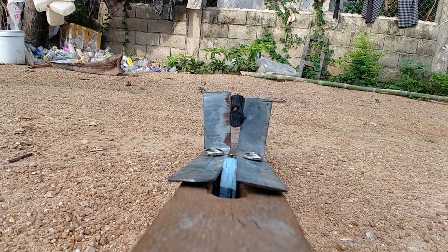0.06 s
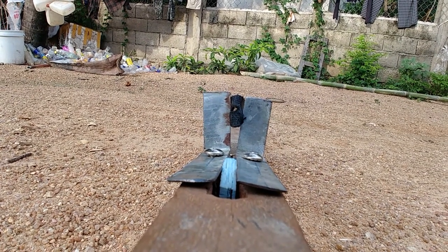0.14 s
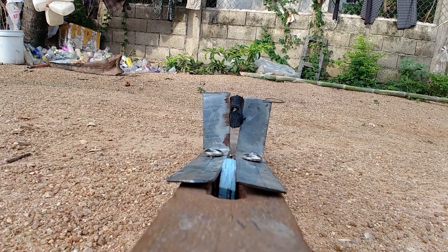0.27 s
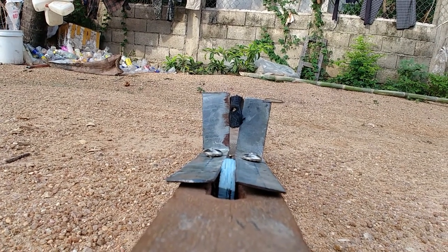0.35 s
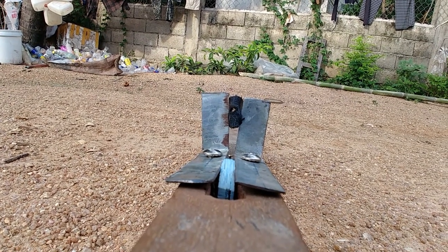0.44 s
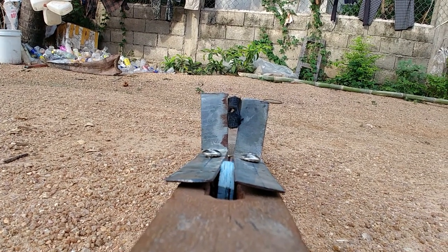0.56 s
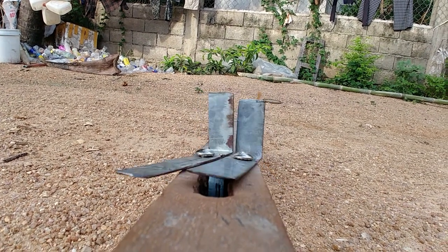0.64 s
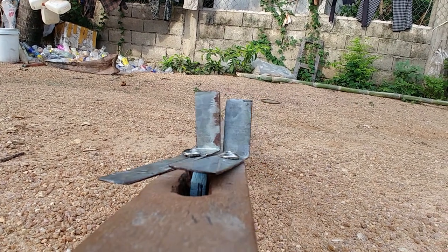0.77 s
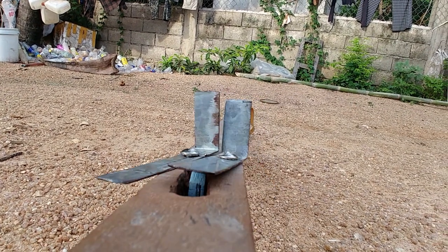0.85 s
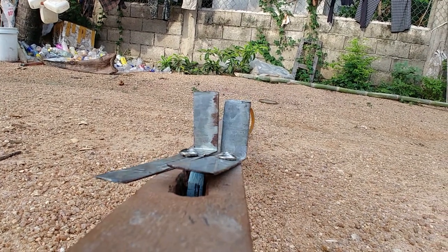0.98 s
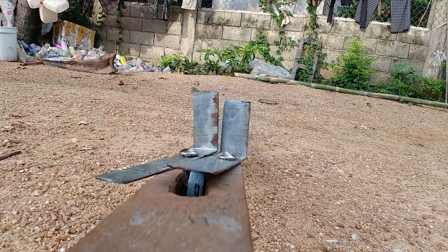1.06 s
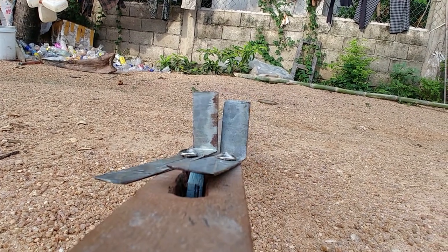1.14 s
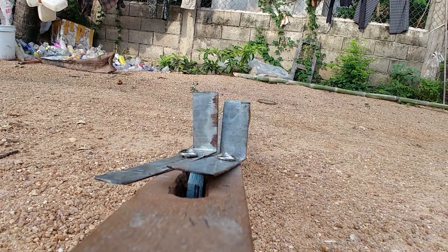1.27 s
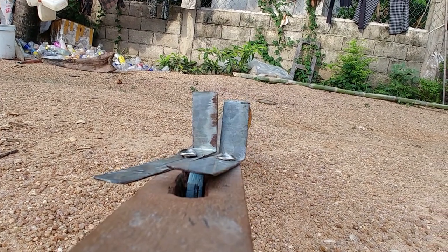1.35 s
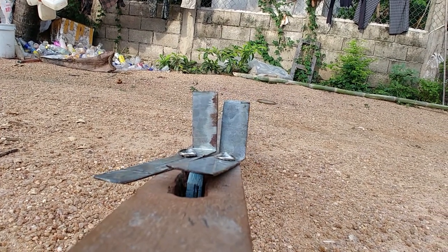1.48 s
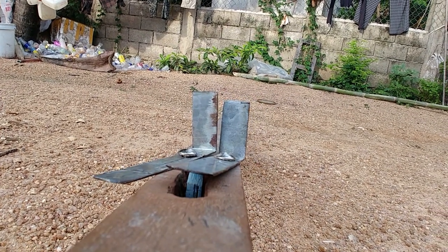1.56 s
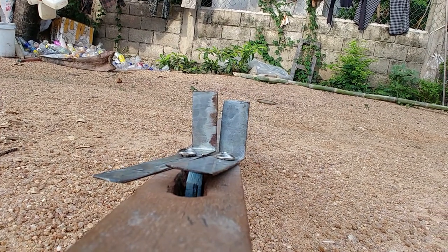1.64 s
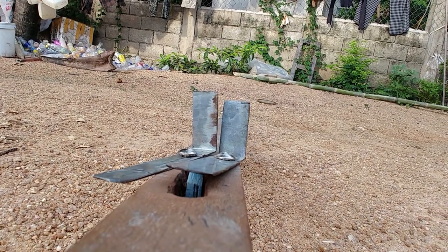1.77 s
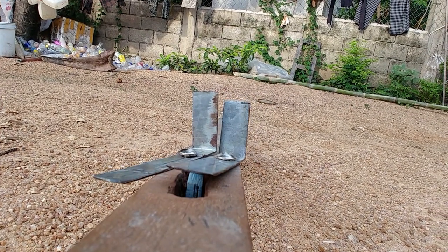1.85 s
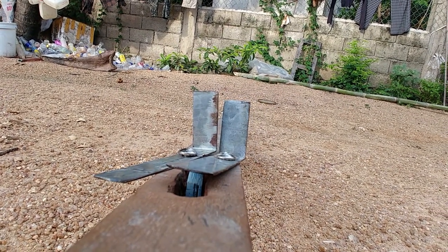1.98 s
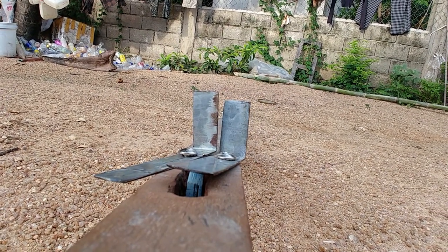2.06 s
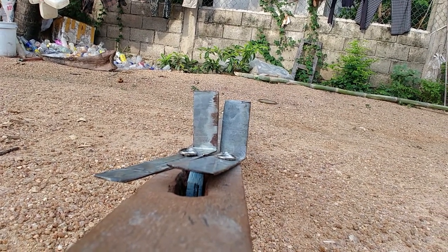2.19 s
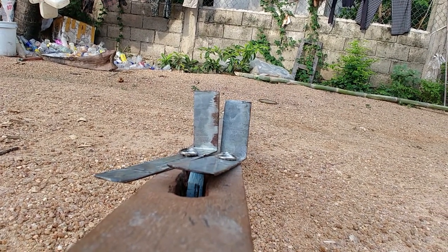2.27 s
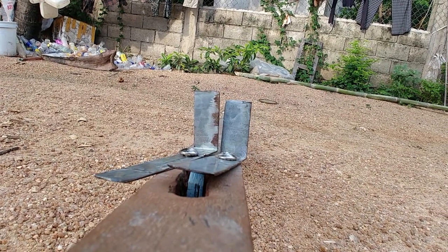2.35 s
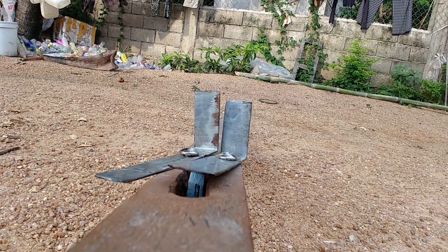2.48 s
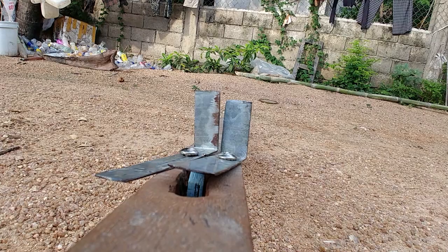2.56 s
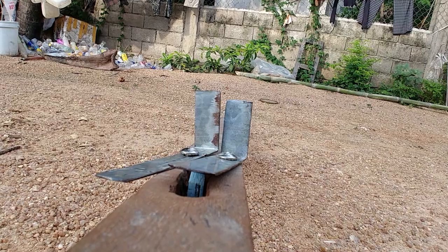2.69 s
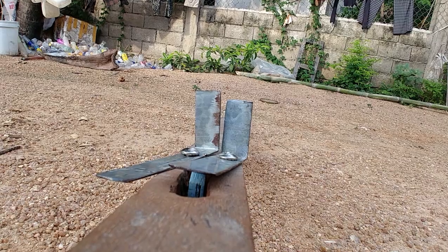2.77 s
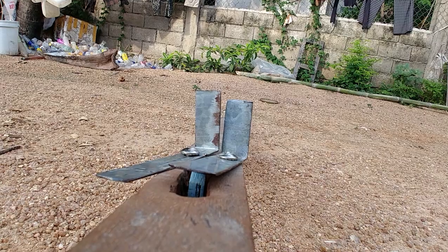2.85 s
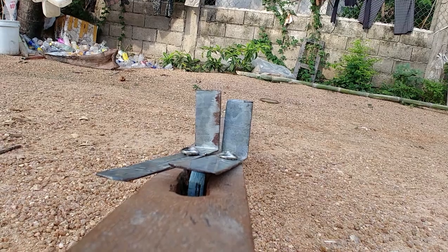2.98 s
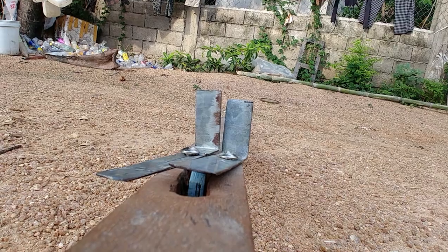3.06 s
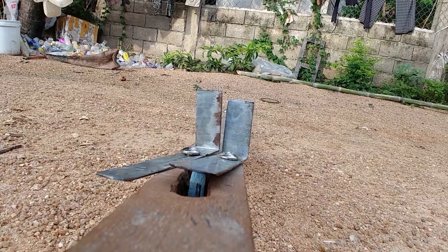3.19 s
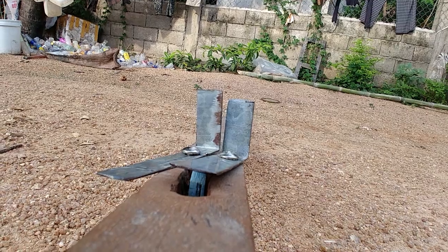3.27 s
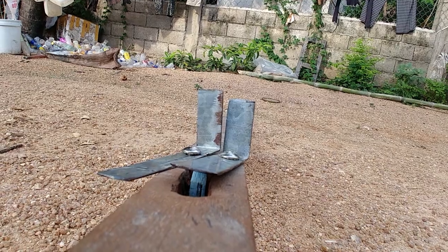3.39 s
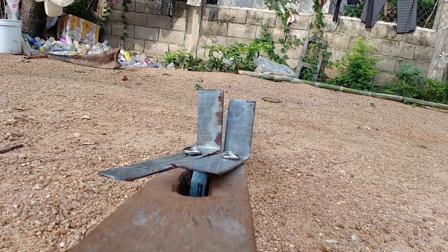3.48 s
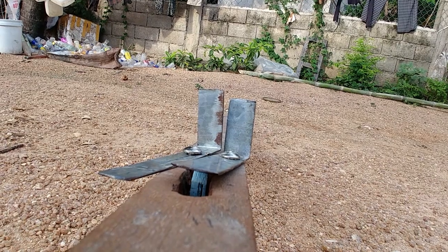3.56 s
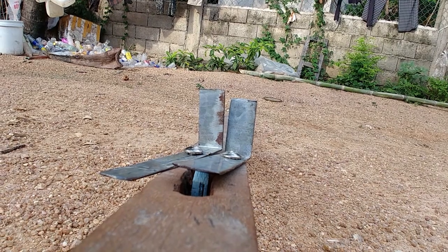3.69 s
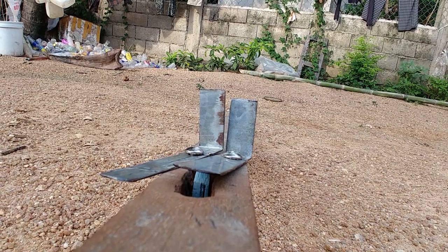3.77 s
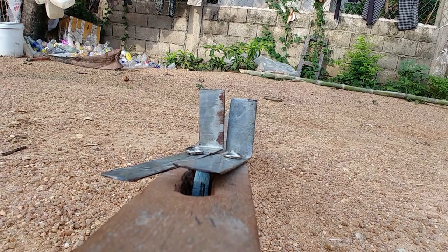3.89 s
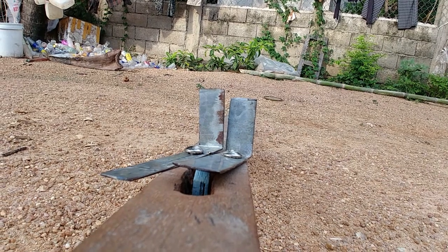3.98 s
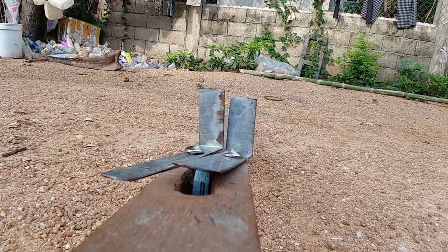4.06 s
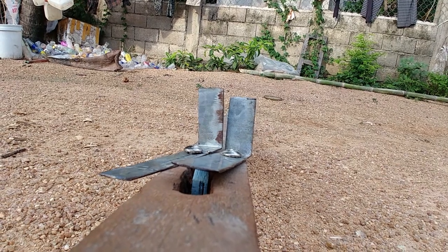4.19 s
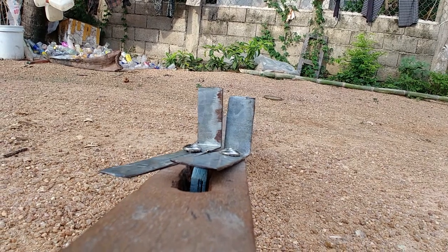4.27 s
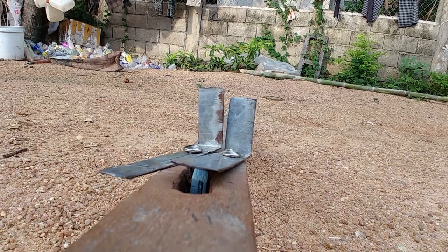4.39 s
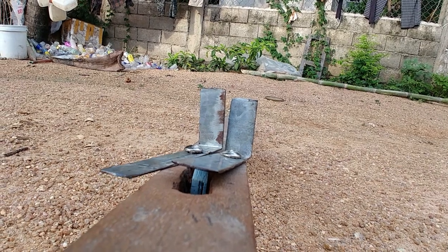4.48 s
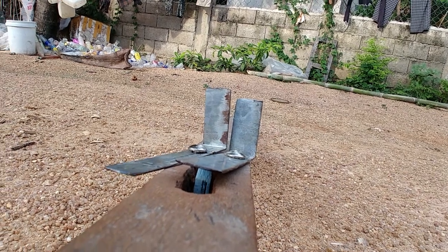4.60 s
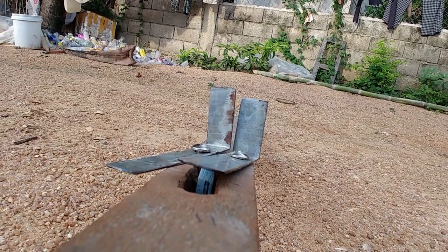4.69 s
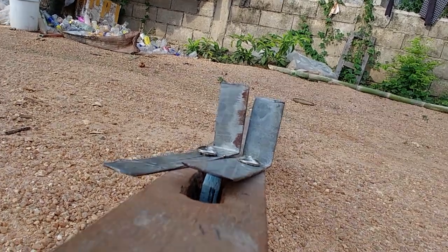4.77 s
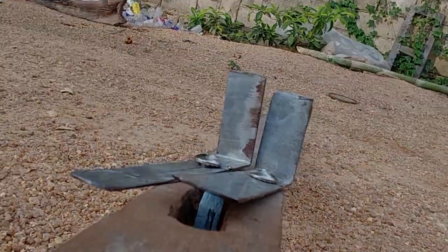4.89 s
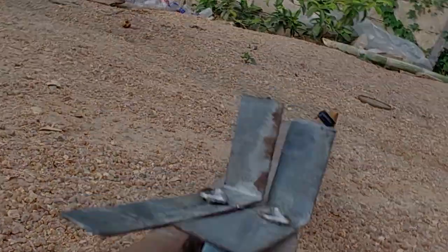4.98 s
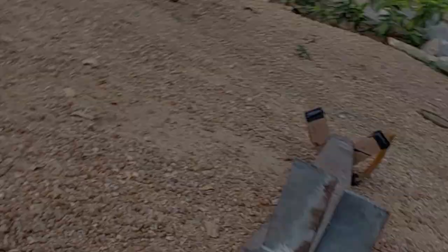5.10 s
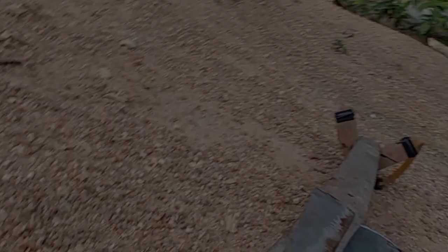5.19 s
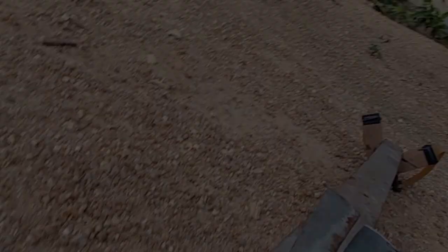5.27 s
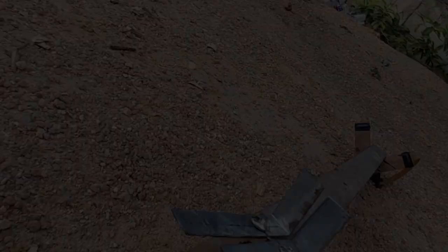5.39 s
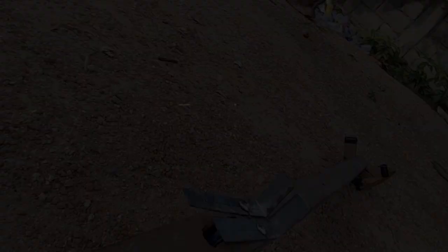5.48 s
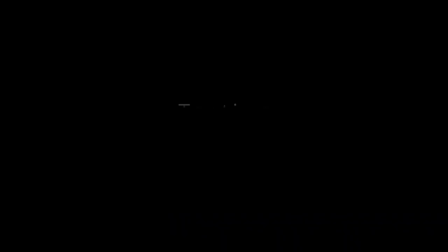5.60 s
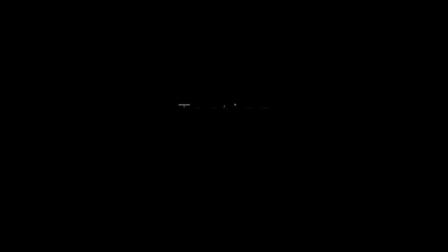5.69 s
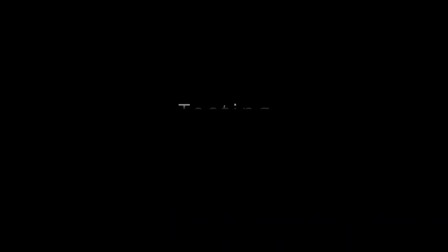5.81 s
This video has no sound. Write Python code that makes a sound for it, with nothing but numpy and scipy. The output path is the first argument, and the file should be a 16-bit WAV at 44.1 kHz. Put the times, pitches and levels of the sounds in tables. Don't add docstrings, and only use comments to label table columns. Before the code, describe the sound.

In an outdoor walled yard, faint cricket chirps and traffic rumble precede tiny trigger squeaks and one very loud, slightly overloaded steel slam with a woody thump. Flaps bounce and ring, then separate knocks follow. Cheeps, a soft dove coo, far poultry and late dog barks sit behind. The microphone is very close, steel leaning right; everything fades out.

```python
import sys
import numpy as np
from scipy import signal
from scipy.fft import rfft, irfft
from scipy.io import wavfile

SR = 44100
rng = np.random.default_rng(int(sys.argv[2]) if len(sys.argv) > 2 else 0)


def makeup_ratio(level_db):
    decades = np.asarray(level_db, float) / 20
    return 10 ** decades


def put_to_file(sound):
    columns = np.atleast_2d(sound).T
    safe = np.clip(columns, -1, 1)
    whole_steps = np.round(safe * 32767)
    wavfile.write(sys.argv[1], SR, whole_steps.astype(np.int16))


N = 257544


def at_hz(points, hz):
    f, value = np.array(points).T
    return np.interp(np.log(hz), np.log(f), value)


def over_time(s, values):
    return np.interp(np.arange(N) / SR, s, values)


def rms_one(x):
    return x / np.sqrt(np.mean(np.mean(np.atleast_2d(x), axis=0) ** 2) + 1e-30)


def sides(lean_db):
    left = makeup_ratio(lean_db)
    return np.array([left, np.ones_like(left)]) * 2 / (1 + left)


def correlated(mid, side, alike):
    alike = np.clip(alike, -1, 1)
    return np.sqrt(1 + alike) * mid + np.sqrt(1 - alike) * side * [[1], [-1]]


def noise(spectrum, lean, likeness):
    hz = np.maximum(np.fft.rfftfreq(N, 1 / SR), 1)
    mid, side = rfft(rng.standard_normal((2, N)))
    pair = correlated(mid, side, at_hz(likeness, hz))
    inside = (hz > spectrum[0][0]) & (hz < spectrum[-1][0])
    lean_gain = [makeup_ratio(at_hz(lean, hz)), np.ones(len(hz))]
    return irfft(pair * inside * makeup_ratio(at_hz(spectrum, hz)) * lean_gain, N)


def drift(rate_hz, size=N):
    r = np.exp(-2 * np.pi * rate_hz / SR)
    settle = 9000
    chance = rng.standard_normal(size + settle)
    return rms_one(signal.lfilter([1], [1, -2 * r, r * r], chance)[settle:])


def bandpass(x, low_hz, high_hz, order):
    return signal.sosfilt(signal.butter(order, [low_hz, high_hz], "band", fs=SR, output="sos"), x)


def add(out, s, sound):
    i = round(s * SR)
    out[..., i:i + sound.shape[-1]] += sound[..., :N - i]


def dying(t60, rise):
    t = np.arange(round(max(t60, .005) * 1.1 * SR)) / SR
    return (1 - np.exp(-t / rise)) * makeup_ratio(-60 * t / t60)


PATCH_EDGES = [150, 350, 600, 1000, 2100]
# t/s, half length/s, band number, level/dB
PASSES = [(2.75, .15, 1, 3), (3.15, .1, 2, 4), (3.27, .07, 1, 3), (3.4, .15, 3, 2.5), (3.6, .08, 0, 3),
          (4.0, .12, 1, 2), (4.33, .1, 2, 4), (4.33, .1, 1, 3), (4.72, .08, 2, 4), (4.72, .08, 1, 3),
          (4.72, .1, 3, 2)]


def patchy(x):
    out, t = x.copy(), np.arange(N) / SR
    for k, edges in enumerate(zip(PATCH_EDGES, PATCH_EDGES[1:])):
        band = signal.sosfiltfilt(signal.butter(2, edges, "band", fs=SR, output="sos"), x)
        lift_db = sum(db * np.exp(-((t - s) / half) ** 2) for s, half, which, db in PASSES if which == k)
        out += (makeup_ratio(1.2 * drift(2.1) + lift_db) - 1) * band
    return out


# t/s, level/dB
TRAFFIC_SWELL = [(0, -2.5), (.15, -1), (.7, 1.5), (1.2, -3), (1.35, 0), (1.6, -1.5), (2.2, -1), (2.65, 1),
                 (2.9, -1), (3.1, 1.5), (3.45, 1.5), (4.05, -0.5), (4.25, 0.5), (4.65, 0.5), (4.85, -0.5),
                 (5.2, -1.5)]
# f/Hz, level/dB per Hz
RUMBLE = [(13, -45), (28, -20), (81, 2.5), (140, -5), (189, -15.5), (260, -14.5), (340, -39.5), (570, -120)]
TRAFFIC = [(88, -29), (150, -1.5), (188, -6.5), (251, -12), (286, -4.5), (663, -8.5), (1100, -25),
           (1600, -27), (2080, -57), (3520, -120)]
HISS = [(530, -26.5), (900, -2), (1340, -4), (2220, -6), (3730, -8.5), (6030, -12), (8050, -13.5),
        (9650, -21.5), (10800, -23), (13000, -20), (15600, -18.5), (16000, -25)]
# f/Hz, left-right level/dB
YARD_LEAN = [(60, -4), (110, -1), (200, -1.5), (380, -3.0), (700, -5.5), (1290, -6), (2380, -5), (4400, -5),
             (8120, -8), (15000, -1)]
# f/Hz, left-right likeness
YARD_LIKENESS = [(60, 1), (130, 0.92), (290, 0.7), (640, -0.29), (1410, 0.24), (3100, 0.22), (6820, 0.49),
                 (15000, -0.03)]


def yard():
    swell_db = over_time(*np.transpose(TRAFFIC_SWELL))
    layers = [noise(colour, YARD_LEAN, YARD_LIKENESS) for colour in (RUMBLE, TRAFFIC, HISS)]
    rumble, traffic, hiss = [rms_one(layer) for layer in layers]
    rumble *= makeup_ratio(-50.5 + swell_db + 2.0 * drift(6.4))
    traffic = patchy(traffic) * makeup_ratio(-61.5 + 1.1 * swell_db + 0.95 * drift(4.8))
    turned_db = over_time([4.95, 5.6], [0, -2.5])
    return rumble + traffic + hiss * makeup_ratio(-69.8 + 0.63 * drift(5) + turned_db)


# t/s, chirps so far
CRICKET_CLOCK = [(.065, 0), (.335, 3), (1.166, 12), (1.535, 16), (1.628, 17), (1.712, 18), (2.166, 23),
                 (2.812, 30), (3.071, 33), (3.424, 37), (4.733, 52), (4.923, 54), (5.63, 62)]
# delay t/s, level/dB, first f/Hz, last f/Hz
STROKES = [
    (-.016, -6.5, 7600, 6800),
    (-.003, 1, 7597, 6702),
    (.009, -8, 7300, 7200),
    (.021, -13.5, 7300, 7200),
]


def cricket(level_db):
    s, count = np.transpose(CRICKET_CLOCK)
    out, u = np.zeros(N), np.linspace(0, 1, 520)
    for centre in np.interp(np.arange(63), count, s):
        loud_db = level_db + rng.normal(0, 1.5)
        for delay, db, first_hz, last_hz in STROKES:
            hz = first_hz + (last_hz - first_hz) * u + rng.normal(0, 98)
            tone = np.sin(np.pi * u ** 0.54) * np.sin(2 * np.pi * np.cumsum(hz) / SR)
            add(out, centre + delay, makeup_ratio(loud_db + db + rng.normal(0, 1.2)) * tone)
    turned_db = over_time([4.95, 5.6], [0, -9])
    return out * makeup_ratio(3.1 * drift(300) + turned_db) * sides(-21.0)[:, None]


def calls(rows, lean_db, sag, rough_hz):
    out = np.zeros((2, N))
    for start, end, first_hz, last_hz, db in rows:
        u = np.linspace(0, 1, round((end - start) * SR))
        wander = .6 + drift(rough_hz, size=SR) + 1j * drift(rough_hz, size=SR)
        wander = wander[np.arange(len(u)) % SR]
        wander *= 1.5 / np.sqrt(np.mean(np.abs(wander) ** 2))
        phase = 2 * np.pi * np.cumsum(last_hz + (first_hz - last_hz) * (1 - u) ** sag) / SR
        whistle = np.sin(np.pi * u) ** .4 * (wander * np.exp(1j * phase)).real
        add(out, start, makeup_ratio(db) * sides(lean_db)[:, None] * whistle)
    return out


def level(rows):
    return [(start, end, hz, hz, db) for start, end, hz, db in rows]


# start t/s, end t/s, f/Hz, level/dB
BARKS = [(5.2, 5.25, 1270, -59), (5.19, 5.245, 1550, -63), (5.19, 5.24, 1880, -69), (5.17, 5.23, 1000, -68),
         (5.415, 5.465, 1500, -59), (5.42, 5.48, 1260, -63), (5.42, 5.47, 1800, -70),
         (5.41, 5.48, 930, -68)]


def dog():
    return calls(level(BARKS), -11.5, sag=1, rough_hz=100)


# start t/s, end t/s, f/Hz, level/dB
FAR_CALLS = [(3.86, 4.04, 1290, -77), (3.92, 4.04, 1730, -80), (4.12, 4.27, 1655, -72),
             (4.31, 4.44, 1620, -74), (4.46, 4.56, 1630, -77), (5.0, 5.19, 1590, -74),
             (3.65, 3.95, 3610, -83), (4.0, 4.14, 3620, -81), (4.18, 4.27, 3610, -80),
             (4.33, 4.6, 3620, -83), (4.12, 4.24, 820, -75), (4.29, 4.45, 815, -72), (3.08, 3.22, 950, -73),
             (3.06, 3.16, 460, -68), (3.0, 3.08, 1800, -79), (3.33, 3.5, 1800, -79),
             (4.53, 4.59, 3100, -83), (4.26, 4.38, 660, -70), (3.22, 3.38, 680, -71)]
# start t/s, end t/s, first f/Hz, last f/Hz, level/dB
CLUCKS = [
    (3.42, 3.5, 1480, 1690, -76),
    (3.69, 3.79, 1170, 1560, -78),
]


def far_poultry():
    return calls(level(FAR_CALLS) + CLUCKS, -10.5, sag=1, rough_hz=18)


# start t/s, end t/s, f/Hz, level/dB
COOS = [
    (2.4, 2.73, 254, -60.5),
    (2.74, 2.95, 252, -60),
]


def dove():
    return calls(level(COOS), -8, sag=1, rough_hz=2.5)


# start t/s, end t/s, first f/Hz, last f/Hz, level/dB
CHEEPS = [(.07, .19, 2900, 2520, -72.5), (1.11, 1.22, 2950, 2550, -70), (1.87, 1.95, 3250, 2950, -74),
          (1.955, 2.05, 3150, 2450, -66), (2.52, 2.56, 3250, 2720, -70), (2.545, 2.635, 2850, 2510, -78),
          (3.495, 3.67, 2980, 2360, -66), (4.775, 4.83, 2600, 2400, -72), (4.71, 4.76, 3420, 3350, -81)]


def chicks():
    cheeps = calls(CHEEPS, -22.0, sag=1.7, rough_hz=60)
    echo_s, echo_db = .035, -6
    return cheeps + makeup_ratio(echo_db) * np.roll(cheeps, round(echo_s * SR), axis=1)


def walls(x, wet_db):
    tail = dying(0.12, rise=0.0045)
    tail = tail * rng.standard_normal((2, SR))[:, :len(tail)]
    tail /= np.sqrt(np.sum(tail ** 2) / 2)
    return x + makeup_ratio(wet_db) * signal.fftconvolve(x, tail, axes=1)[:, :N]


def blows(rows, rise, spread, alike, strike=0):
    out = np.zeros((2, N))
    for s, db, hz, t60, lean_db in rows:
        fall = dying(t60, rise)
        mid, side = rng.standard_normal((2, round(.8 * SR)))[:, :len(fall)]
        pair = correlated(mid, side, alike)
        pair[:, round(rise * SR)] += strike * np.sqrt(SR / hz)
        body = bandpass(pair, hz / spread, min(hz * spread, .45 * SR), order=3)
        add(out, s, makeup_ratio(db) * sides(lean_db)[:, None] * fall * body / body.std())
    return out


# t/s, level/dB, body f/Hz, t60/s, left-
# right level/dB
THUMPS = [(.452, -25, 430, .1, -16.5), (.478, -11, 1450, 0.057, -3), (.555, -37.5, 1020, 0.27, -8.5),
          (.42, -36, 600, 0.14, -10), (.478, -14, 560, .08, -8), (.481, -16, 720, 0.14, -3.5),
          (.478, -14, 170, 0.15, 1.5), (.4906, -5, 1180, .064, 2.5), (.493, -15, 300, .17, 2.5),
          (.503, -18.5, 704.7, .12, -7), (.55, -36.5, 486, 0.26, -13.5), (0.455, -30, 110, 0.44, -2),
          (.6, -41.5, 360, 0.38, -5), (.655, -42.5, 494, 0.18, -5.5)]
# t/s, level/dB, body f/Hz, t60/s, left-right level/dB
KNOCKS = [(1.117, -57.5, 892, .13, -5), (1.2515, -31, 708, 0.16, -5), (1.25, -47, 1400, 0.13, -12),
          (1.27, -44, 228, 0.19, -3), (1.258, -39, 390, .18, -2), (1.9767, -27, 475, 0.11, -4),
          (1.98, -33, 262, .18, -1), (1.985, -33.5, 103, 0.3, -2.5), (2.562, -53, 519, 0.3, -5),
          (2.575, -51, 450, .2, -3), (2.572, -56, 1150, 0.23, -10), (5.162, -42.5, 520, 0.071, 4.5),
          (5.162, -42, 219.8, 0.11, 12), (5.515, -43, 493, 0.05, -1.5), (4.33, -55, 750, 0.046, -4)]
# start t/s, f/Hz, left level/dB, right level/dB, t60/s
RECOIL = [
    (0.5048, 62, -11, -12, 0.17),
    (.4981, 114.2, -9, -12, 0.13),
    (.478, 234.8, -10, -7.5, 0.12),
    (0.479, 348, -15, -7, 0.053),
    (.78, 489, -46, -44.5, 0.21),
    (0.96, 405, -50.5, -48, 0.28),
]


def stock():
    out = blows(THUMPS, rise=0.00072, spread=1.5, alike=-0.0053)
    out += blows(KNOCKS, rise=0.0008, spread=1.453, alike=0.66, strike=1.2)
    lag = np.array([[0], [1.0]])
    for s, hz, left_db, right_db, t60 in RECOIL:
        swing = dying(t60, rise=0.0045)
        wave = np.sin(2 * np.pi * hz * np.arange(len(swing)) / SR - lag)
        add(out, s, makeup_ratio(np.array([[left_db], [right_db]])) * swing * wave)
    return out


# t/s, slip rate f/Hz, rise/s, fundamental level/dB, octave level/dB
SLIPS = [
    (.4015, 1645, .0015, -14.5, -15.5),
    (.4258, 1540, .004, -12.5, -24),
    (.4275, 2810, .002, -19, -34),
    (.4456, 1400, .0012, -13, -1.5),
]


def trigger():
    out, t = np.zeros(N), np.arange(-400, 1200) / SR
    for s, hz, rise, first_db, octave_db in SLIPS:
        fall = max(.0043 - rise, .001)
        spindle = np.where(t < 0, np.exp(-(t / rise) ** 2), np.exp(-(np.abs(t) / fall) ** 1.3))
        upper_db = (first_db + octave_db) / 2 - 14
        levels_db = [first_db, octave_db, upper_db, upper_db - 9.5, upper_db - 12]
        wobble = .25 * drift(250, size=len(t))
        tone = np.zeros(len(t))
        for k, db in enumerate(levels_db, 1):
            tone += makeup_ratio(db) * np.sin(2 * np.pi * (k * hz * t + rng.random()) + k * wobble)
        add(out, s + t[0], 1.75 * spindle * tone)
    late_s, far_db, dull_hz = .0014, -13, 2600
    dull = signal.sosfilt(signal.butter(1, dull_hz, fs=SR, output="sos"), out)
    return np.array([makeup_ratio(far_db) * np.roll(dull, round(late_s * SR)), out])


# t/s, peak level/dB, colour f/Hz, tail level/dB
GRIT = [(.4, -22, 3260, -12), (.42, -28, 4300, -24), (.4245, -14, 4300, -24), (.4248, -16, 7000, -34),
        (.427, -17, 2400, -13), (.401, -27, 6600, -26), (.4545, -21, 7800, -30), (.465, -24, 2700, -20),
        (.444, -16, 4200, -17), (.4495, -19, 5200, -24)]
# t/s, peak level/dB, colour f/Hz, left-right level/dB, tail level/dB
SLAMS = [(.4539, -13, 2700, -13, -16), (.4783, -2, 3100, -25, -22), (.4845, -6, 7900, -27.5, -14),
         (0.4903, 1.5, 3100, -3.5, -31), (.4955, -5, 1800, 2.5, -32), (.4865, -7, 2700, -20, -30),
         (.5024, -10.5, 7690, -12, -38), (.5254, -31.5, 8000, -21, -13.5), (0.5, -34.5, 2775, -24, 2),
         (.5123, -13, 6500, -20, -30)]
# t/s, peak level/dB, colour f/Hz, tail level/dB
BOUNCES = [(.5557, -31, 2720, -20), (.5861, -30, 3000, -24), (.5955, -28.5, 7800, -20),
           (.6066, -27, 2950, -27), (.607, -25, 4330, -25), (.616, -37, 3500, -25), (.6254, -29, 6400, -30),
           (.643, -38, 4900, -30), (.662, -35, 8200, -24), (.6374, -32, 2820, -32), (.6559, -31, 2770, -29),
           (.7074, -39, 5300, -17), (.7143, -29, 6600, -24), (.7722, -10.5, 8400, -16.5),
           (.9014, -54, 8120, -2), (.9016, -50, 2600, -14), (.9474, -44, 8000, -10),
           (.9547, -43.5, 7800, 1.5), (1.0331, -51.5, 8170, 1.5)]
# t/s, peak level/dB, colour f/Hz, tail level/dB
SETTLING = [(1.1179, -43.5, 4950, 0), (1.1398, -47.5, 4220, -1), (1.2251, -44, 7600, -5.5),
            (1.2441, -42.5, 7440, -7), (1.2674, -37, 4500, -9), (1.2965, -36.5, 4280, -17),
            (1.3399, -48, 7610, -1.5), (1.3844, -49, 7420, -22), (1.3967, -51, 8410, -6),
            (1.7539, -43, 7830, -11.5), (1.9101, -28, 5780, -17), (1.929, -34.5, 5830, -9.5),
            (1.9769, -49, 2670, -1)]
# t/s, peak level/dB, colour f/Hz
TICKS = [(4.0443, -50.5, 1900), (4.0775, -52, 1600), (4.164, -54, 2800), (4.077, -52, 3585),
         (4.109, -50.5, 1600), (4.1632, -48, 1900), (4.3303, -52, 800), (4.781, -53, 1200),
         (4.8561, -54, 4200), (4.9292, -44, 2000), (4.9296, -46, 4400), (4.946, -55, 1600),
         (5.3486, -64, 1735), (5.394, -68, 1476), (5.4894, -61, 1530), (5.574, -76, 3606),
         (5.5894, -77, 3670)]


def touches():
    def kind(rows, t60, lean_db):
        return [(s, db, hz, t60, lean_db, tail_db) for s, db, hz, tail_db in rows]
    slams = [(s, db, hz, .019, lean_db, tail_db) for s, db, hz, lean_db, tail_db in SLAMS]
    ticks = kind([(*row, -18) for row in TICKS], t60=0.016, lean_db=-17.0)
    grit = kind(GRIT, t60=0.021, lean_db=-15.5)
    bounces = kind(BOUNCES, t60=0.014, lean_db=-17.5)
    return grit + slams + bounces + kind(SETTLING, t60=.019, lean_db=-15) + ticks


def contacts(rows, dull, bright):
    out, size = np.zeros((2, N)), round(.2 * SR)
    for s, db, hz, t60, lean_db, tail_db in rows:
        shape = np.zeros(size)
        add(shape, 0, dying(t60, rise=0.00014))
        add(shape, 0, makeup_ratio(tail_db) * dying(.13, rise=0.0011))
        start = round(s * SR)
        broad = (dull + 1.4 * (hz / 8000) ** 1.5 * bright)[:, start:start + size]
        tinted = bandpass(broad, hz / 1.25, hz * 1.1, order=1)
        sound = tinted / tinted[1].std() + 0.18 * broad
        add(out, s, sides(lean_db)[:, None] * makeup_ratio(db - 7) * shape * sound)
    return out


# peak t/s, swell/s, peak level/dB, loss/dB per s, brightness level/dB
CHATTER = [
    (.5, .001, -19.5, 244.5, -1),
    (0.608, 0.023, -33.5, 200, -2.5),
    (0.659, 0.0032, -41, 110, -6.5),
    (.786, .006, -40.5, 205, -0.5),
    (.956, 0.0055, -49.5, 93, -.5),
    (1.259, 0.034, -43, 245, -3),
    (1.92, .002, -50, 142, -10),
]


def chatter(dull, bright):
    out, t = np.zeros((2, N)), np.arange(N) / SR
    grain_db = 1.6 * drift(300) - 4.5
    rest_s, rest_db = .68, -11.5
    for s, swell, db, loss_db, bright_db in CHATTER:
        past = t - s
        curve_db = db + np.minimum(15 * past / swell, -loss_db * past)
        level_db = np.where(past < -swell, -150, curve_db)
        rest = makeup_ratio((s < rest_s) * rest_db * np.clip((t - rest_s) / .004, 0, 1))
        share = np.clip(makeup_ratio(bright_db), .05, .98)
        grains = makeup_ratio(level_db + grain_db) * sides(-13.5)[:, None]
        out += grains * (np.sqrt(1 - share ** 2) * rest * dull + share * rest ** .3 * bright)
    return out


# f/Hz, level/dB, t60/s
FLAP_MODES = [(2770, -20, 0.047), (2770, -15.5, 0.058), (3602, -20.5, .04), (7800, -18, 0.085),
              (12370, -17.5, 0.066), (8746, -32.5, 0.67), (5852, -40, 0.3), (4930, -33.5, 0.11),
              (2770, -39, 0.064), (14070, -41, 0.056), (12400, -36, 0.055), (2800, -28, 0.03),
              (3740, -36, 0.05), (3270, -33, 0.1), (8746, -56, .5), (3300, -50, .15), (4550, -52, .12)]
STRUCK = [.4785, .489, .4785, .485, .481, .5125, .5125, .588, .586, .586, .595, .636, .656, .405, .7722,
          1.245, 1.245]


def ringing():
    out = np.zeros((2, N))
    for s, (hz, db, t60) in zip(STRUCK, FLAP_MODES):
        t = np.arange(round(t60 * SR)) / SR
        mode = (1 - np.exp(-t / .0008)) * makeup_ratio(db - 60 * t / t60) * np.sin(2 * np.pi * hz * t)
        add(out, s, sides(-20.0)[:, None] * mode)
    return out


# f/Hz, level/dB per Hz
DULL_STEEL = [(530, -39.5), (900, -13.5), (1050, -10), (1160, -6.5), (1960, -11), (2800, -5), (3610, -6.5),
              (4920, -7.5), (6000, -8.5), (7800, -41), (13200, -120)]
BRIGHT_STEEL = [(2940, -45), (5000, -7), (5720, -10.5), (6240, -3.5), (7040, -8), (8050, 2.5), (8660, -7),
                (9260, -13), (10100, -21), (10750, -43.5), (11500, -20.5), (13400, -14), (15900, -14.5),
                (16500, -30)]
# f/Hz, level/dB
SHADE = [(700, 4), (2400, 6.5), (5000, 0.5), (8200, -9), (12000, 2.5), (16000, 2.5)]
# t/s, level/dB, band f/Hz, t60/s, left-right level/dB
SPARKS = [
    (.4783, -10, 14510, 0.012, -14.5),
    (.4905, -12.5, 14510, 0.03, -0.5),
    (.4905, -5.5, 3501, 0.025, 8.5),
    (.5122, -15.5, 7001, 0.0083, -17.5),
    (.7722, -21, 12900, 0.0082, -32),
    (.7722, -33, 8000, 0.0074, -28),
]


def steel():
    unlike = [(700, .2), (16000, .05)]  # f/Hz, left-right likeness
    dull, bright = [noise(colour, SHADE, unlike) for colour in (DULL_STEEL, BRIGHT_STEEL)]
    dull, bright = dull / dull[1].std(), bright / bright[1].std()
    sparks = blows(SPARKS, rise=.0005, spread=1.8, alike=0.078)
    return contacts(touches(), dull, bright) + sparks + chatter(dull, bright) + ringing()


def scene():
    animals = cricket(level_db=-63.5) + dog() + far_poultry() + dove() + chicks()
    return yard() + walls(animals, wet_db=-5) + stock() + trigger() + steel()


def top_cut(x):
    return signal.sosfilt(signal.butter(12, 16370, fs=SR, output="sos"), x)


def record(dry):
    top = .99
    limited = dry / (1 + np.abs(dry / top) ** 6) ** (1 / 6)
    cut = signal.sosfilt(signal.cheby2(16, 60, 16300, fs=SR, output="sos"), limited)
    fade = makeup_ratio(-1.52) * over_time([4.99, 5.68], [1, 0]) ** 0.71
    return top_cut(cut * fade)


dry = scene()
out = record(dry)
put_to_file(out)
```